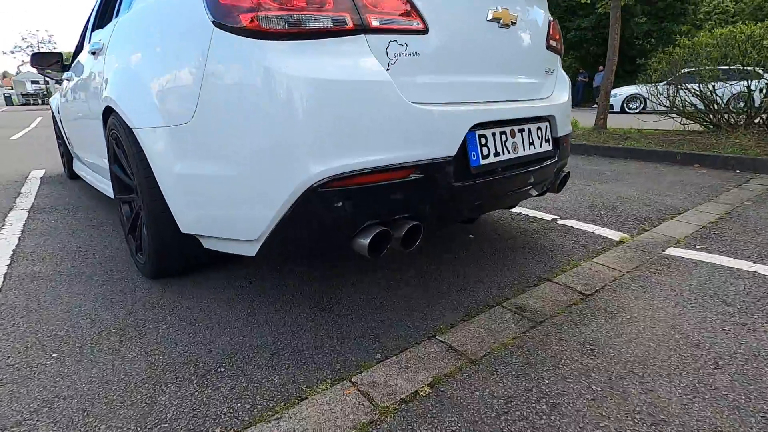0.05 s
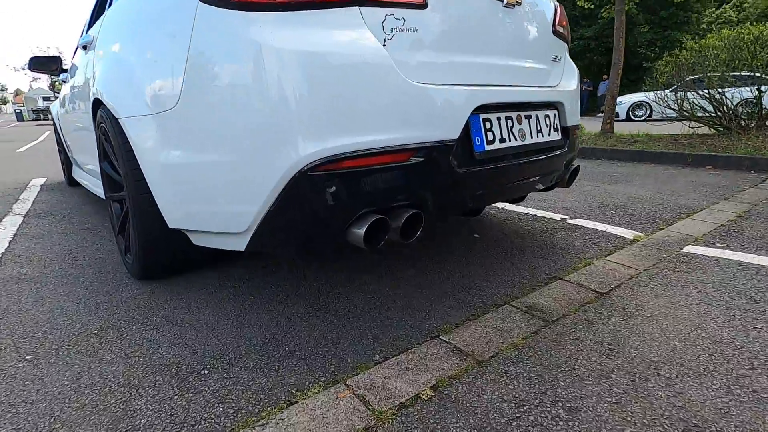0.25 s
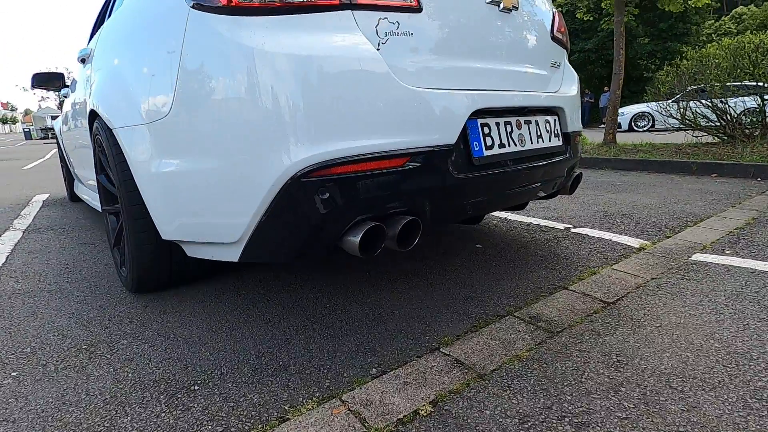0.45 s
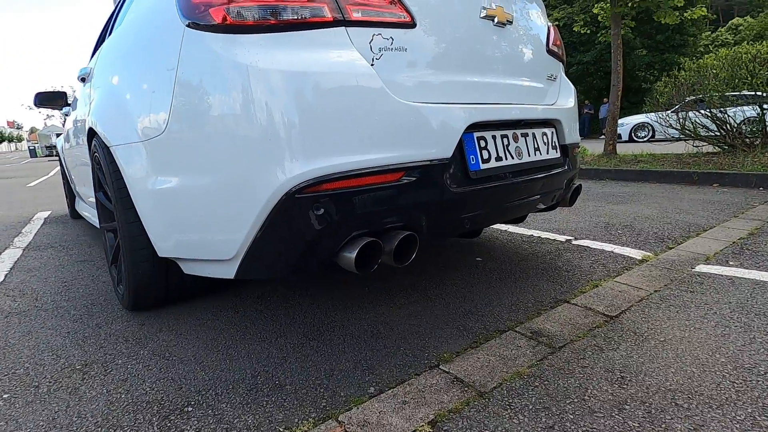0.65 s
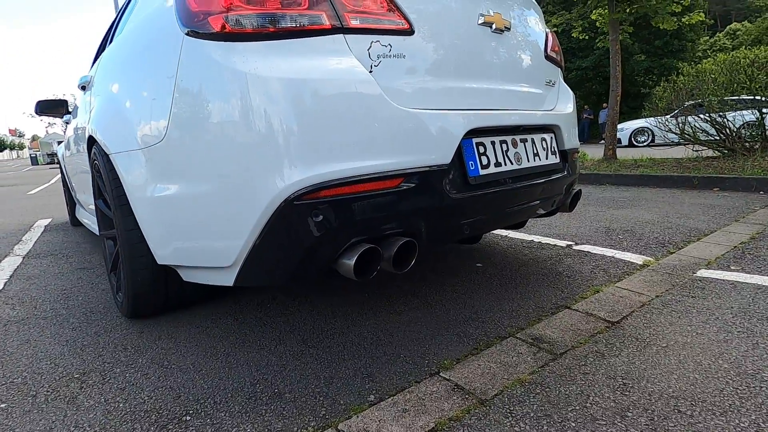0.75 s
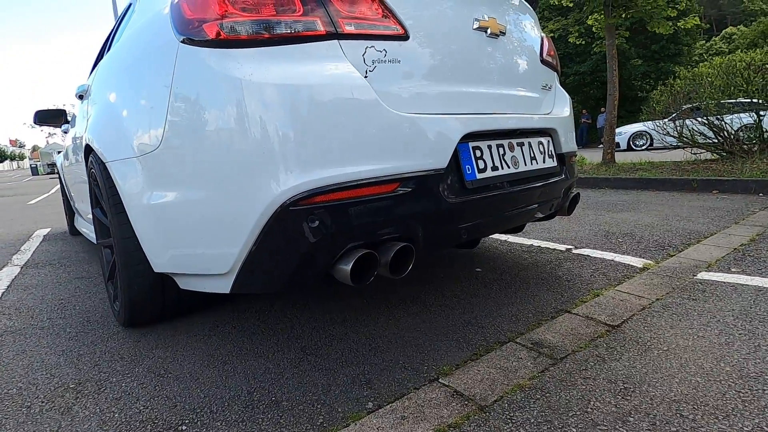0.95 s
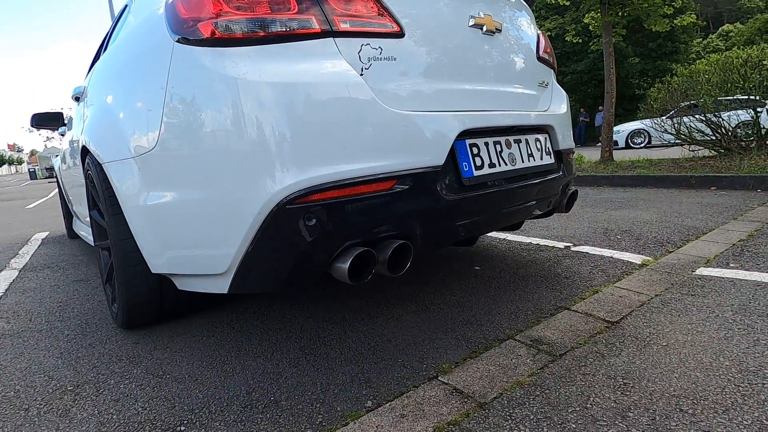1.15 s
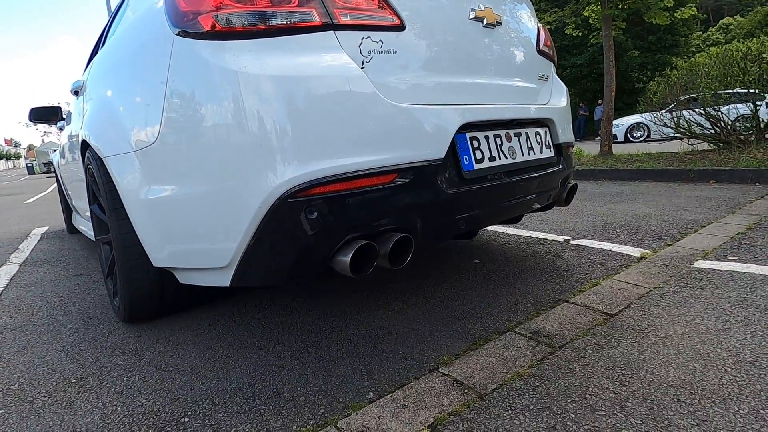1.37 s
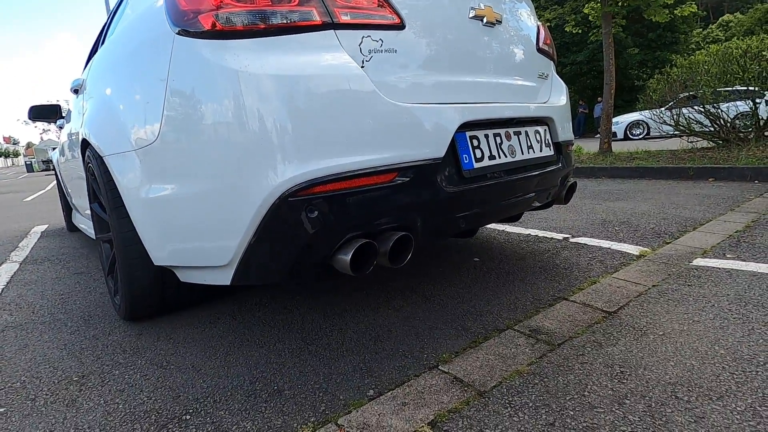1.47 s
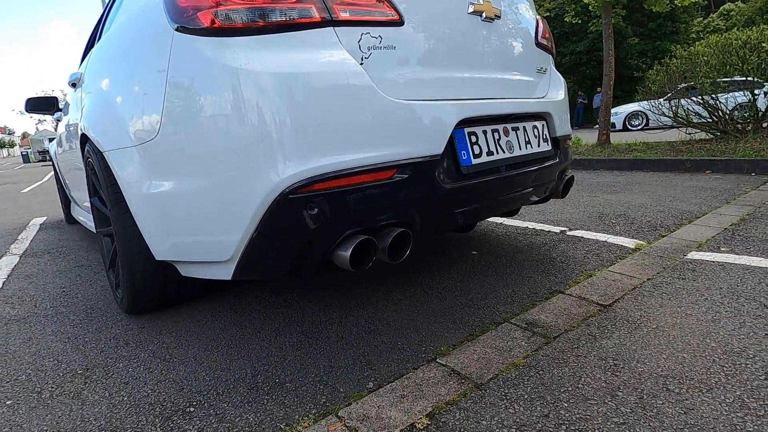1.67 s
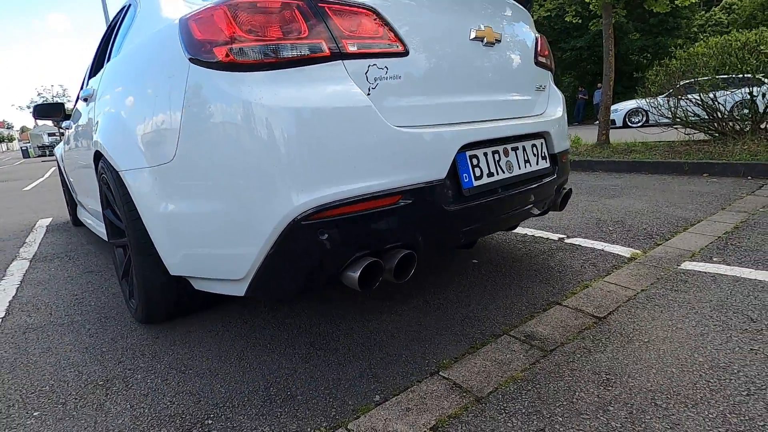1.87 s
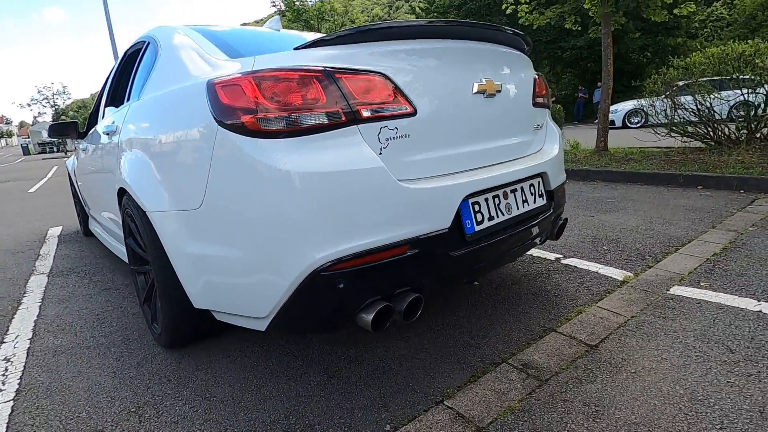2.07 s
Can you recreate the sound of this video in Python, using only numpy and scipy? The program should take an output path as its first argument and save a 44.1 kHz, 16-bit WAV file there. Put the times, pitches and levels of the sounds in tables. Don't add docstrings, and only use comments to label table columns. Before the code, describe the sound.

A large V8 idles through its exhaust, a loud deep boom with an uneven, loping beat and soft gassy burble, recorded close behind the tailpipes in an open car park with faint traffic behind.

```python
import sys
import numpy as np
from scipy import signal
from scipy.fft import rfft, irfft, next_fast_len
from scipy.io import wavfile
from scipy.ndimage import uniform_filter1d

SR = 44100
rng = np.random.default_rng(int(sys.argv[2]) if len(sys.argv) > 2 else 0)


def volts_from_db(level):
    exponent = np.asarray(level, float) / 20
    return 10 ** exponent


def pcm_store(signal):
    levels = np.round(np.clip(np.atleast_2d(signal), -1, 1) * 32767)
    wavfile.write(sys.argv[1], SR, levels.astype(np.int16).T)


N = 93227
LEAD = SR // 4

# (frequency [Hz], width [Hz], level [dB])
TAILPIPE = [(224, 120, -17.5), (273.6, 17, 2.5), (323, 89, 7.5), (347, 110, 4.5), (456.4, 49, 1),
            (601, 120, -2.5), (754, 58, 2.5), (925, 150, -4.5), (1207, 180, -4.5)]


def level(x, db):
    return x * volts_from_db(db) / np.sqrt(np.mean(x ** 2))


def shape(x, gain):
    pad = 512
    size = next_fast_len(N + SR)
    s = 1j * np.arange(size // 2 + 1) * SR / size
    padding = [(0, 0)] * (x.ndim - 1) + [(pad, pad)]
    mirrored = np.pad(x, padding, mode="reflect", reflect_type="odd")
    return irfft(rfft(mirrored, size) * gain(s), size)[..., pad:pad + x.shape[-1]]


def peak(s, hz, width):
    return s * width / (s * s + s * width + hz * hz)


def walk(rate):
    k = int(SR / rate)
    steps = np.repeat(rng.standard_normal(N // k + 1), k)
    return 1.55 * uniform_filter1d(uniform_filter1d(steps, k), k)[:N]


def wide(hz):
    mid, side = rng.standard_normal((2, N))
    return mid + min(hz / 12000, .45) * side * np.array([[1], [-1]])


def ringing(table, gate, source, flicker_db):
    total = 0
    for hz, width, db in table:
        flicker = volts_from_db(flicker_db * min(350 / width, 1) * walk(33.92))
        drive = source(hz) * gate * flicker
        total = total + volts_from_db(db) * shape(drive, lambda s: peak(s, hz, width) * peak(s, hz, 2 * width))
    return total


def firings():
    # (start [s], strength of the wavering first firing [dB], lateness [firings])
    cycles = [(-0.0887, -18.0, -0.0), (0.0444, -3.9, -0.01), (0.1771, -15.0, 0.02), (0.3167, -2.2, -0.03),
              (0.4509, -18.1, 0.01), (0.5901, -1.8, -0.01), (0.7253, -7.3, 0.01), (0.8634, -2.7, -0.0),
              (1.0011, -6.6, 0.01), (1.1431, -4.3, -0.02), (1.2847, -2.8, -0.02), (1.4224, -16.1, -0.03),
              (1.5669, -1.6, -0.02), (1.7052, -14.2, -0.06), (1.8456, -1.0, 0.0), (1.984, -16.1, -0.02),
              (2.1246, -16.1, -0.02)]
    # (strength [dB], lateness [firings])
    lope = [(-9.0, -0.04), (-2.3, 0.01), (-6.5, -0.09), (-0.6, -0.04), (-6.9, 0.01), (-0.5, -0.0),
            (-10.1, 0.1), (-1.0, 0.01), (-13.4, 0.11), (-3.0, -0.02), (-5.5, -0.03), (-0.8, 0.0),
            (-14.3, 0.04), (-0.6, -0.0)]
    lope_gas_db = [-13.5, 3, -18.5, -2.5, -11, 0.5, -1, 0, -16, -18, -8.5, 2, -9, -7]
    # (time [s], thump level [dB], gas level [dB])
    spits = [(0.011, -9, 6), (0.029, -2, 1), (0.044, -9, 7), (0.061, -1, 0), (0.079, -5, -1),
             (0.094, -9, -3), (0.11, -1, 0), (0.161, 1, 6), (0.177, -9, 0), (0.212, 1, -4), (0.228, -2, 1),
             (0.246, 2, -2), (0.282, 4, -1), (0.316, 2, 0), (0.334, -2, 6), (0.367, 3, 2), (0.401, 2, -1),
             (0.434, 1, 2), (0.52, 0, -4), (0.555, 3, -2), (0.607, 0, 5), (0.64, 3, -3), (0.708, 1, 3),
             (0.76, 2, -3), (0.794, 4, -6), (0.829, 5, 0), (0.863, -1, 0), (0.881, -3, 4), (0.915, -3, -2),
             (0.949, 3, -3), (0.984, 1, 1), (1.037, -2, -2), (1.071, 2, -3), (1.108, 2, -6), (1.196, 1, -2),
             (1.267, -1, 2), (1.284, 1, 0), (1.319, 0, 2), (1.353, 5, -1), (1.388, 2, 3), (1.441, 3, 6),
             (1.476, -3, -5), (1.549, -3, 3), (1.567, 3, 0), (1.602, 3, 0), (1.635, 2, -3), (1.671, 1, 1),
             (1.723, 4, 2), (1.828, -2, 3), (1.846, 0, 5), (1.88, 2, -1), (1.914, 2, 0), (1.949, 1, 1),
             (2.002, 0, 6), (2.072, -2, 1)]
    # (time [s], strength [dB], lateness [ms])
    odd = [(-0.023, -0.5, -1.6), (-0.005, -9.4, -0.1), (0.011, -0.9, -0.4), (0.029, -9.0, -1.4),
           (0.044, -2.0, -0.3), (0.079, -10.9, -0.6), (0.127, -0.7, 0.2), (0.161, -1.5, 0.1),
           (0.177, -18.6, 1.2), (0.194, -12.6, -1.0), (0.212, -3.1, -0.4), (0.301, -8.9, -0.6),
           (0.401, -0.9, 0.3), (0.434, -1.3, 0.1), (0.502, -11.2, -0.1), (0.538, -8.6, 0.3),
           (0.555, -0.3, 0.4), (0.574, -8.1, -0.8), (0.692, -18.0, 0.3), (0.776, -4.5, 0.6),
           (0.794, 0.0, 0.3), (0.812, -9.3, 0.3), (0.932, -14.7, 0.0), (0.949, -1.3, -0.4),
           (0.967, -25.6, -0.5), (1.018, -5.6, -0.1), (1.071, 0.0, -0.1), (1.09, -10.0, 0.3),
           (1.143, -4.2, -0.5), (1.161, -0.3, -0.1), (1.213, -3.9, 0.3), (1.232, -0.2, 0.2),
           (1.25, -18.9, 0.4), (1.319, -1.7, -0.2), (1.335, -5.8, 0.5), (1.371, -10.7, 0.1),
           (1.422, -14.4, -1.4), (1.461, -12.4, 0.5), (1.494, -7.7, -0.1), (1.549, -0.9, -0.3),
           (1.567, -0.7, 0.0), (1.583, -4.8, 0.5), (1.602, -1.8, 0.4), (1.617, -9.8, 0.5),
           (1.635, -0.4, 0.5), (1.69, -9.9, -0.9), (1.723, -1.5, -0.4), (1.775, -4.5, 0.3),
           (1.793, -0.4, 0.2), (1.862, -9.6, 0.8), (1.896, -10.6, 0.8), (1.932, -4.0, -0.3),
           (1.949, 0.3, 0.2), (1.984, -14.8, -0.8), (2.09, -21.0, -0.6), (2.107, -0.4, 0.5)]
    push_scatter_db, gas_scatter_db, jitter = .2, .6, .004

    strength, late = np.array(lope).T
    pattern = np.c_[strength, lope_gas_db, late].reshape(2, 7, 3)
    rows = []
    for k, (_, first_db, first_late) in enumerate(cycles[:-1]):
        rows += [(first_db, first_db, first_late), *pattern[k % 2]]
    rows = np.array(rows)
    chance = rng.standard_normal((len(rows), 4))
    slot = np.arange(len(rows)) + rows[:, 2] + jitter * chance[:, 3]
    at = np.interp(slot, 8 * np.arange(len(cycles)), np.array(cycles)[:, 0])
    db = rows[:, [0, 1, 1]]
    for s, *both_db in spits:
        db[np.abs(at - s).argmin(), 1:] = both_db
    for s, push_db, late_ms in odd:
        k = np.abs(at - s).argmin()
        db[k, 0] = push_db
        at[k] += late_ms / 1000
    scatter = chance[:, :3] * [push_scatter_db, gas_scatter_db, gas_scatter_db]
    trains = np.zeros((3, N + 2 * LEAD))
    trains[:, (at * SR).astype(int) + LEAD] = volts_from_db(db + scatter).T
    return trains


def puffs(gas):
    rise_s, fall_s = .004, .006
    turn = 2 * np.pi
    flow = shape(gas, lambda s: 1 / (1 + turn * s * rise_s) / (1 + turn * s * fall_s))
    flow = flow[LEAD:][:N]
    return flow / flow.mean()


def boom(push):
    # (frequency [Hz], width [Hz], level [dB], polarity [+1 or -1])
    boom_modes = [(71.9, 20.1, 10.0, 1), (102.0, 22.4, 4.0, -1), (134.4, 12.0, -1.7, -1),
                  (170.5, 13.8, -17.4, 1)]
    muffler_hz, leak_hz = 210, 6.4

    def gain(s):
        modes = sum(sign * volts_from_db(db) * peak(s, hz, width) for hz, width, db, sign in boom_modes)
        return modes * s / (s + leak_hz) / (1 + s / muffler_hz) ** 3

    return level(shape(push, gain)[LEAD:][:N], -14.5)


def burble(kick, t):
    # (frequency [Hz], width [Hz], level [dB])
    burble_modes = [(129.2, 9.4, -1.5), (149.5, 21.4, -7), (178.3, 13, -19)]
    # (time [s], level [dB])
    effort = [
        (0, -1),
        (.15, 1.5),
        (.55, 1),
        (1.1, -5),
        (1.5, -3),
        (1.85, 0),
        (2.1, 10.5),
    ]
    rough = level(ringing(burble_modes, 0.12 + puffs(kick), wide, 2.2), -29.5)
    return rough * volts_from_db(np.interp(t, *np.array(effort).T))


def rumble(kick):
    return level(ringing(TAILPIPE[:5], 0.44 + puffs(kick), lambda hz: wide(7.1 * hz), 0.5), -48)


def thump(kick):
    hz, width_hz, delay_s = 308, 115, .0029
    gain = lambda s: np.exp(-2 * np.pi * s * delay_s) * peak(s, hz, width_hz) ** 3
    return level(shape(kick, gain)[LEAD:][:N], -52)


def spit(puff):
    steady = .25
    return level(ringing(TAILPIPE[5:], steady + puff, lambda hz: wide(3.34 * hz), 1.0), -49.5)


def bay(puff):
    # (frequency [Hz], width [Hz], level [dB])
    bay_modes = [(1813, 420, -4), (2314, 270, -2.5), (2588, 42, 2), (2607, 120, -5), (2962, 75, 2.5),
                 (3237, 160, -3), (3725, 38, -3.5), (4070, 240, -9.5), (4415, 420, -4.5),
                 (5400, 1160, -10.5), (7680, 270, -16.5), (8460, 210, -15), (9070, 510, -19.5)]
    ticks_per_s, tick_db, gate_depth, flicker_db = 540, -10, 0.44, 3.3

    def rustle(hz):
        hiss = wide(hz)
        struck = rng.random(N) < ticks_per_s / SR
        ticks = struck * rng.standard_normal(N) * np.sqrt(SR / ticks_per_s)
        return hiss + ticks * volts_from_db(tick_db)

    return level(ringing(bay_modes, 1 + gate_depth * puff, rustle, flicker_db), -53.5)


def clicks(t):
    # (time [s], peak level [dB], frequency [Hz], right-hand share [0-1])
    stone = [
        (.5165, -38, 3800, .65),
        (.5245, -33.5, 4200, .65),
        (.5245, -37, 2000, .65),
        (.5258, -55, 7800, .6),
    ]
    fall_s = .0014
    out = 0
    for s, db, hz, right in stone:
        burst = rng.standard_normal(N) * np.exp(-np.abs(t - s) / fall_s) * (t >= s)
        tick = shape(burst, lambda z: peak(z, hz, .7 * hz) ** 3)
        pan = 2 * np.array([[1 - right], [right]])
        out = out + volts_from_db(db) * tick / np.abs(tick).max() * pan
    return out


def other_car(t):
    hz, width_hz, fall_s = 563, 67, 0.21
    hum = shape(wide(3 * hz), lambda s: peak(s, hz, width_hz) ** 2)
    return level(hum, -50) * np.exp(-t / fall_s)


def air():
    # (frequency [Hz], level per Hz [dB])
    spectrum = [(120, -31), (200, -4.5), (435, -11), (776, -22), (1530, -25.5), (3010, -19), (3490, -26),
                (8670, -50), (10400, -55.5), (13500, -64.5), (22000, -70.5)]
    hz, db = np.array(spectrum).T
    centres = 240 * 2 ** np.arange(0, 6.5, .5)
    bands = [(f, f / 3, np.interp(np.log(f), np.log(hz), db)) for f in centres]
    return level(ringing(bands, volts_from_db(.7 * walk(8)), wide, 1.5), -47.5)


def scene():
    left_db, left_lag_s = .58, .00003
    t = np.arange(N) / SR
    push, kick, gas = firings()
    puff = puffs(gas)
    tilt = volts_from_db(np.array([[left_db], [-left_db]]) / 2)
    low = (boom(push) + burble(kick, t)) * tilt
    exhaust = low + rumble(kick) + thump(kick) + spit(puff)
    left, right = exhaust + bay(puff) + clicks(t) + other_car(t) + air()
    return np.array([shape(left, lambda s: np.exp(-2 * np.pi * s * left_lag_s)), right])


def top_cut(x):
    return signal.sosfilt(signal.butter(12, 15090, fs=SR, output="sos"), x)


def record(dry):
    ceiling, top_hz, fade_in_s, offset = .55, 14100, .0002, .0026
    pad = SR // 8
    middle = np.pad(dry.mean(axis=0), pad, mode="reflect", reflect_type="odd")
    swing = np.abs(signal.hilbert(middle))[pad:][:N]
    held = dry / (1 + (uniform_filter1d(swing, size=200) / ceiling) ** 4) ** .25
    soft = shape(held, lambda s: 1 / (1 + 0.56 * s / top_hz + (s / top_hz) ** 2))
    fade = np.minimum(np.arange(N) / SR / fade_in_s, 1)
    return top_cut(soft * fade + offset)


dry = scene()
out = record(dry)
pcm_store(out)
```